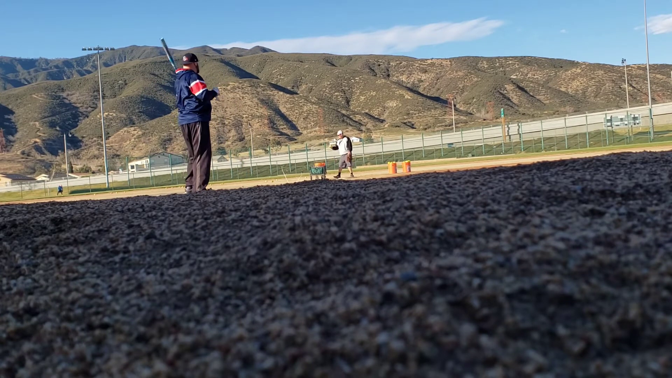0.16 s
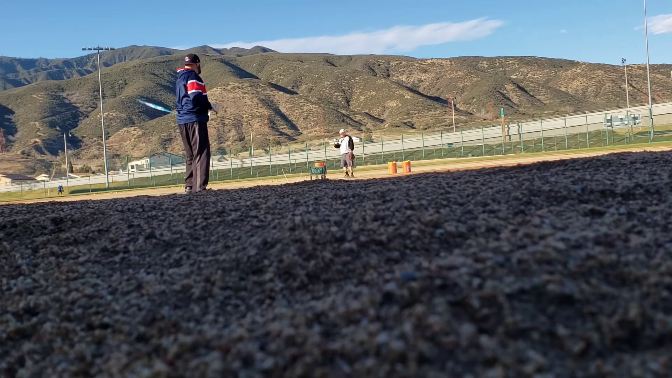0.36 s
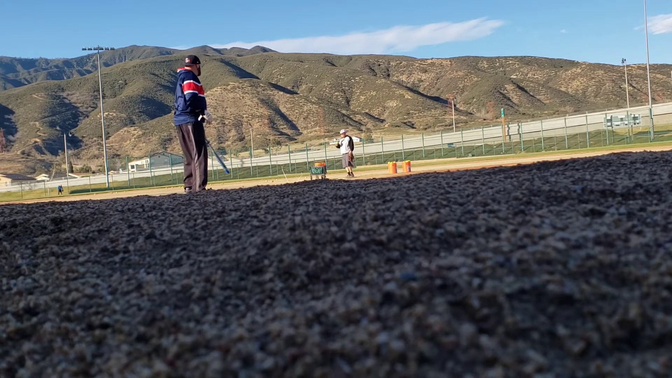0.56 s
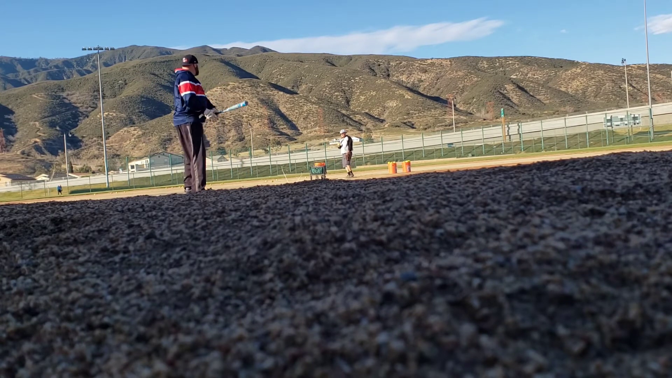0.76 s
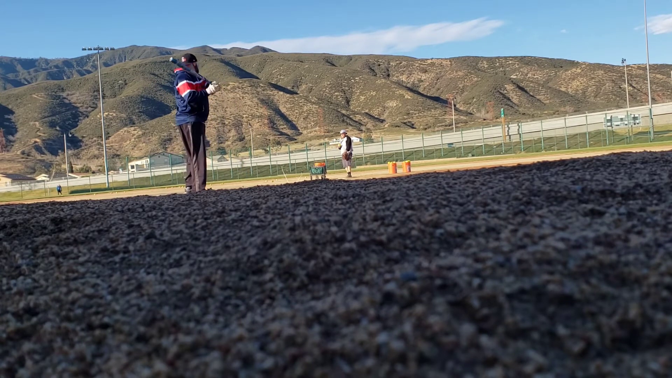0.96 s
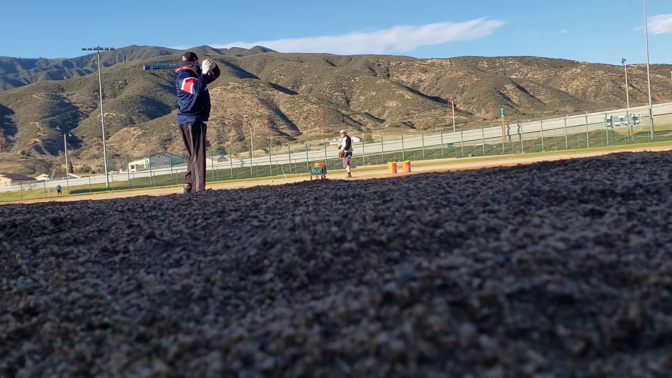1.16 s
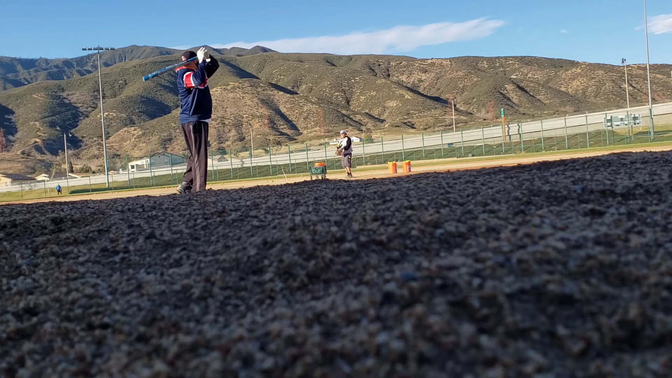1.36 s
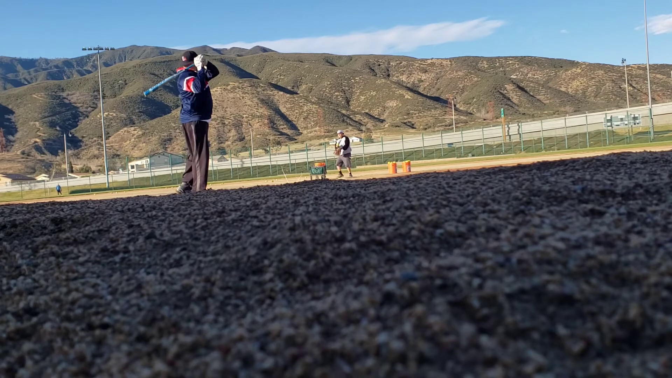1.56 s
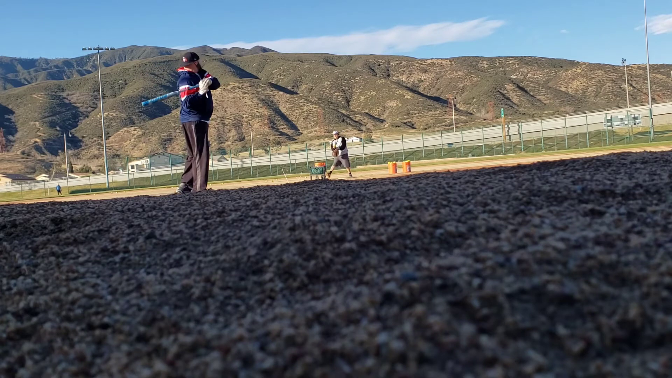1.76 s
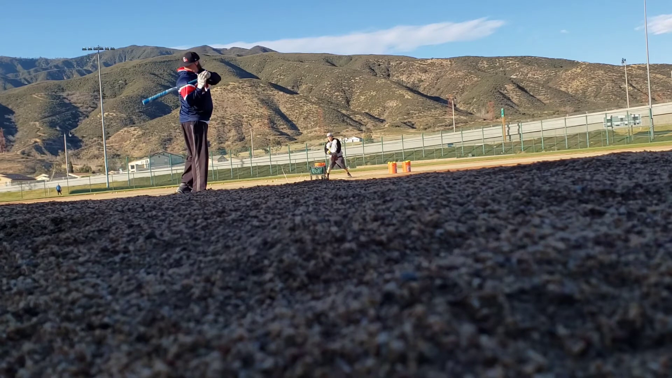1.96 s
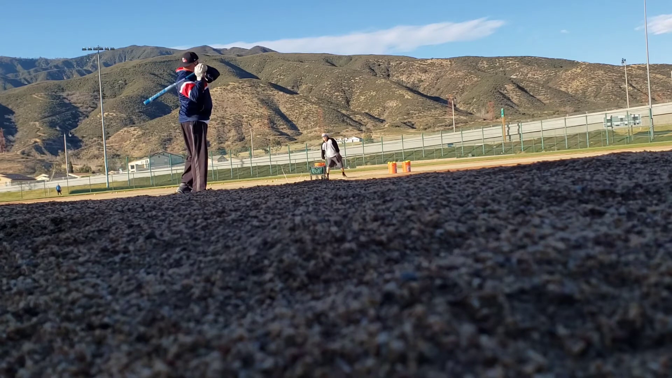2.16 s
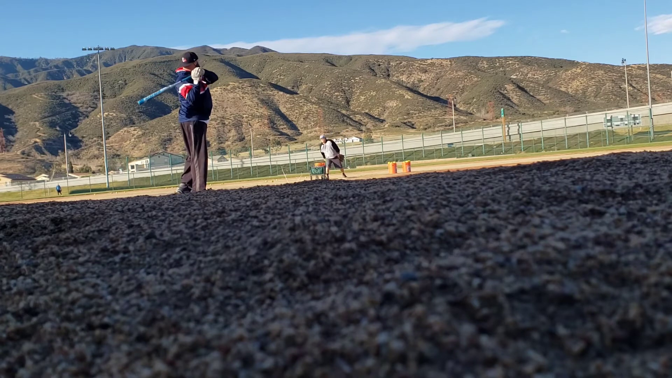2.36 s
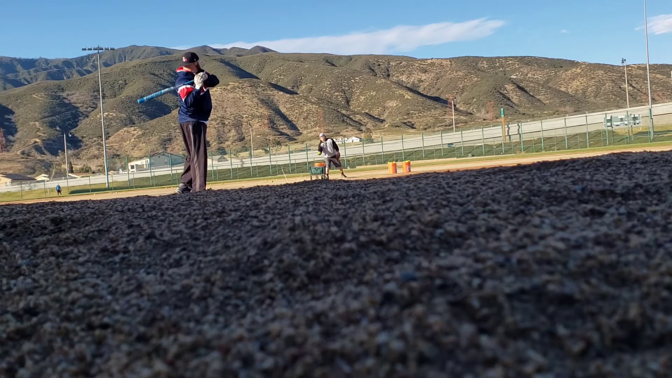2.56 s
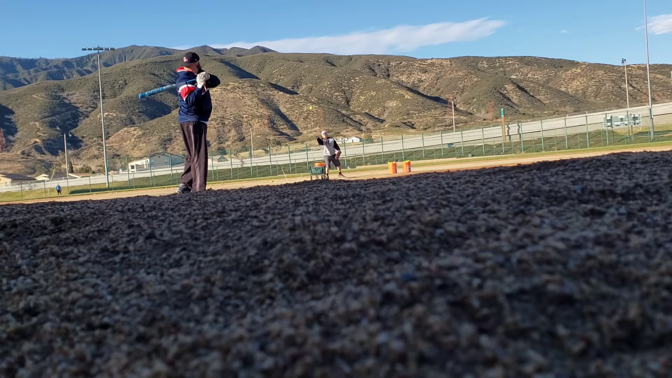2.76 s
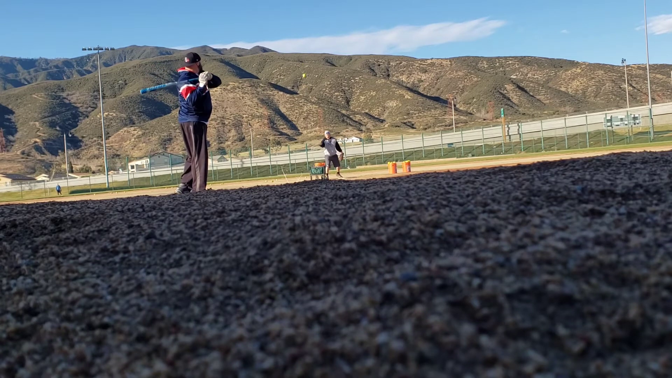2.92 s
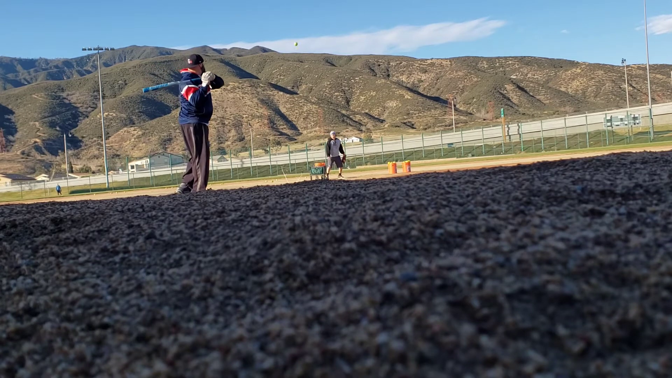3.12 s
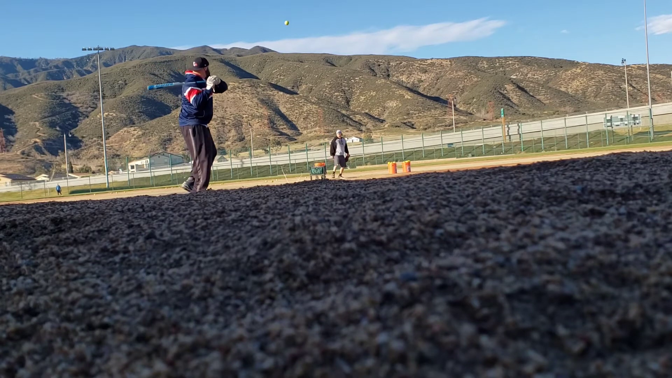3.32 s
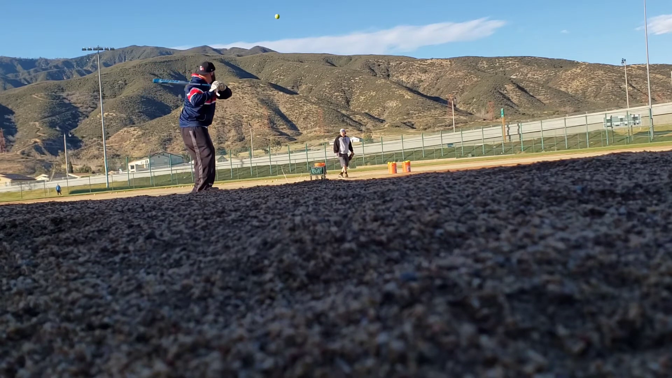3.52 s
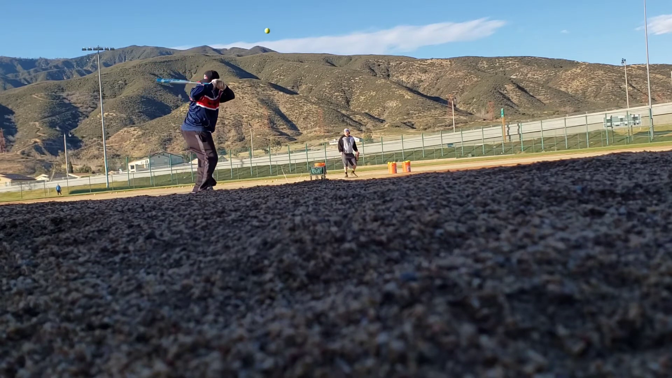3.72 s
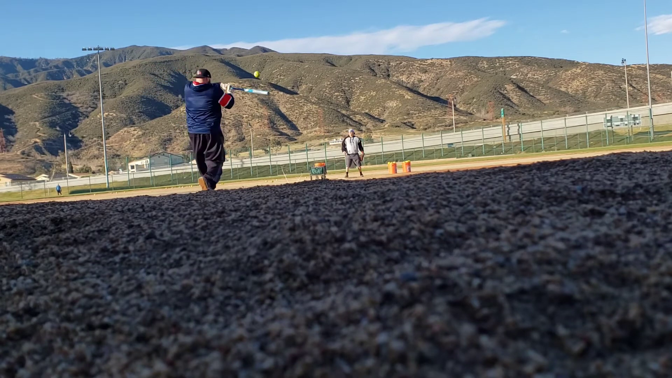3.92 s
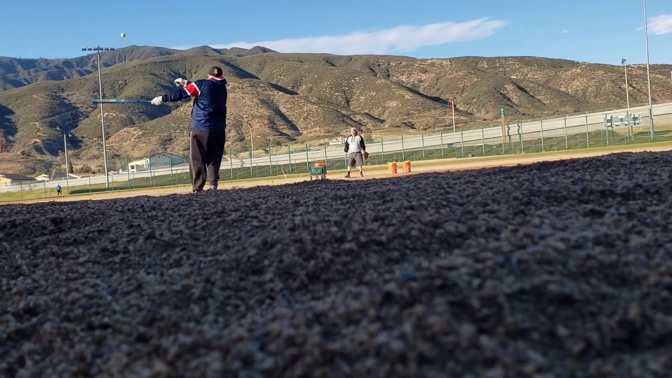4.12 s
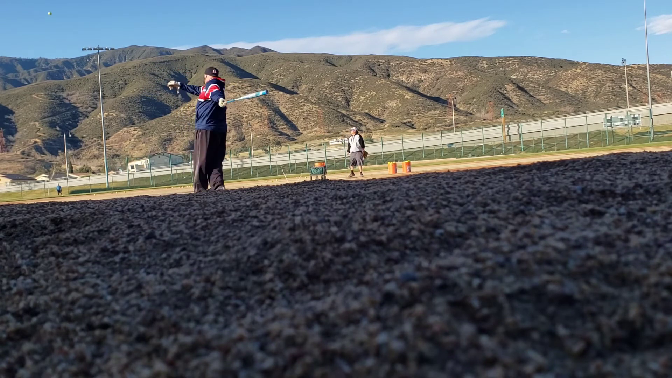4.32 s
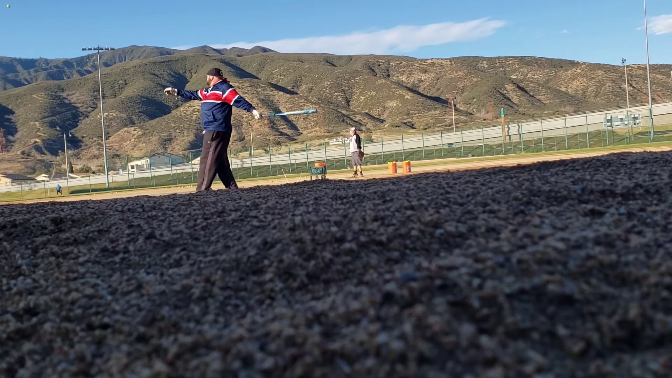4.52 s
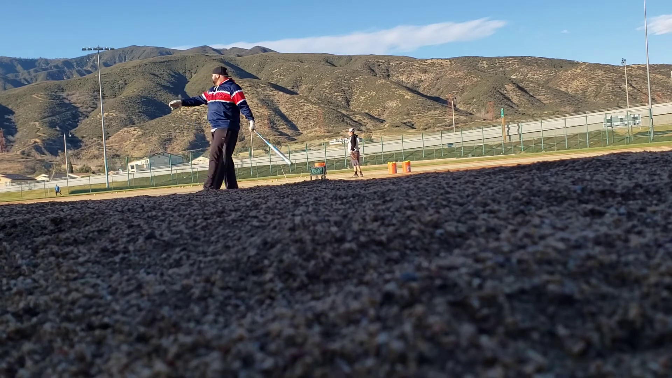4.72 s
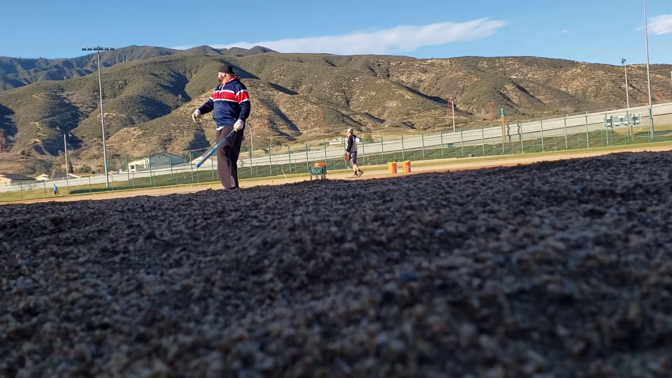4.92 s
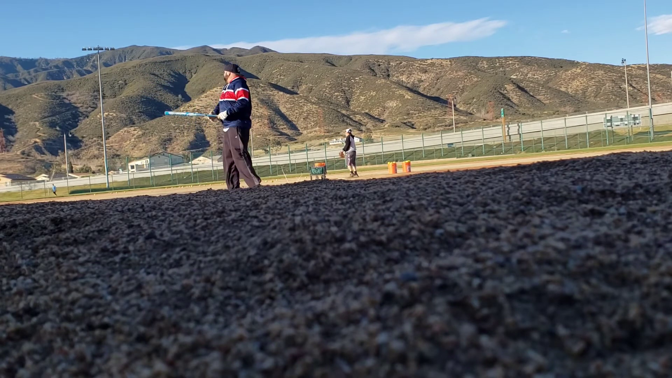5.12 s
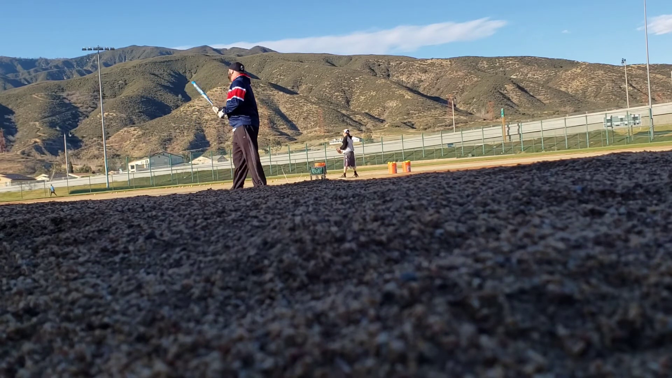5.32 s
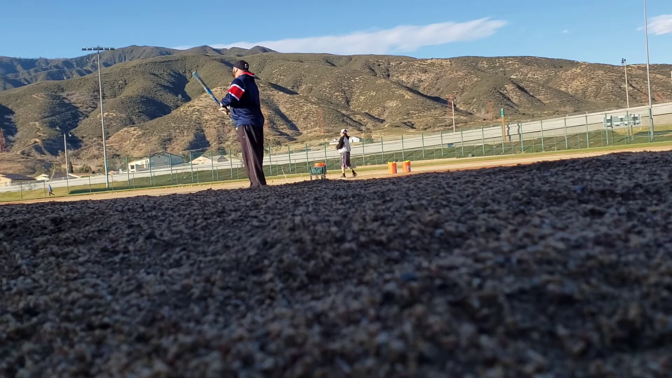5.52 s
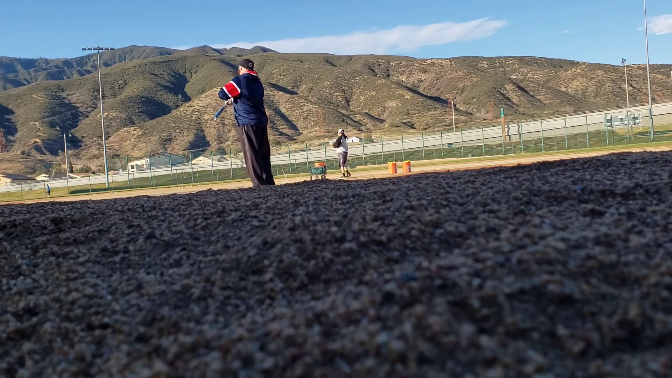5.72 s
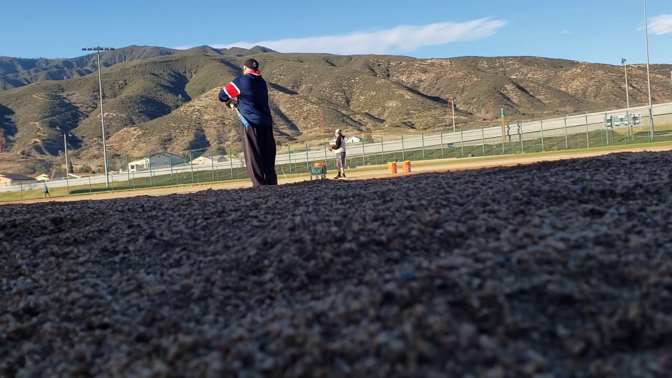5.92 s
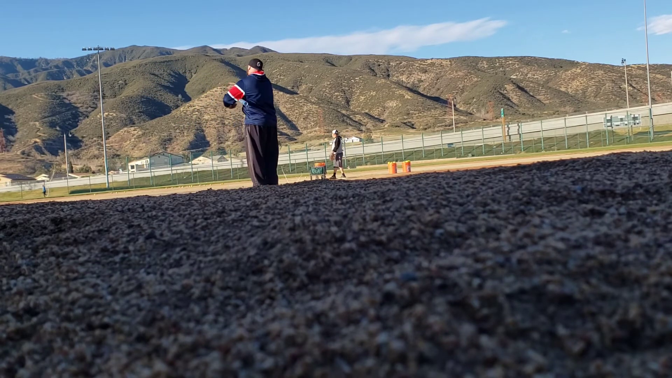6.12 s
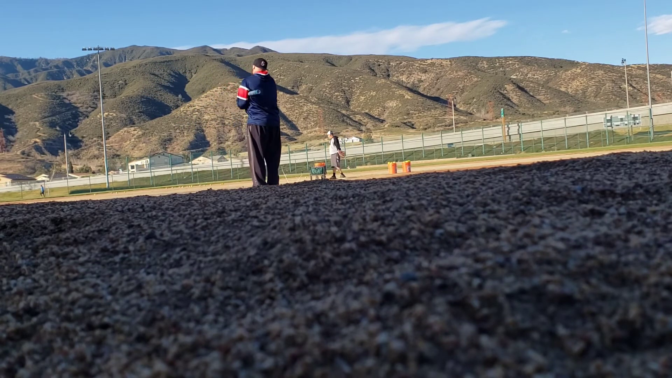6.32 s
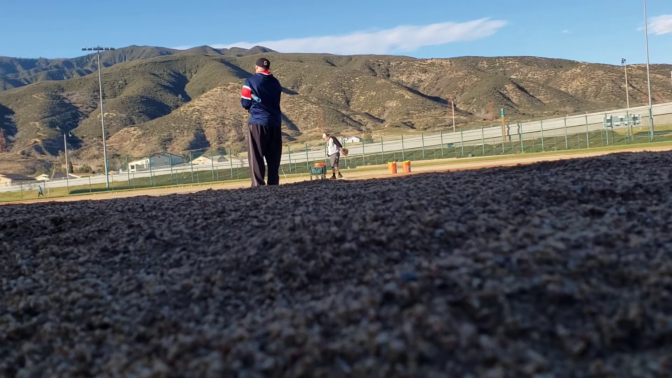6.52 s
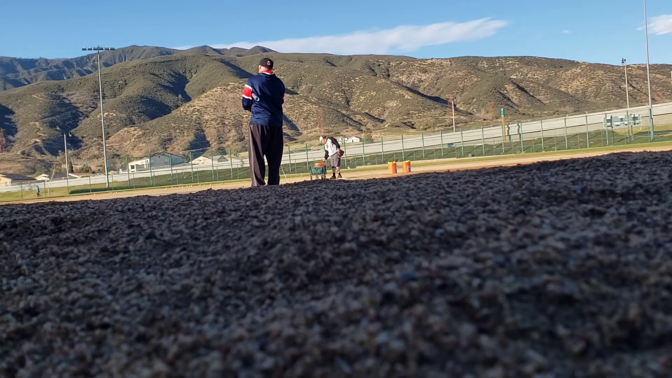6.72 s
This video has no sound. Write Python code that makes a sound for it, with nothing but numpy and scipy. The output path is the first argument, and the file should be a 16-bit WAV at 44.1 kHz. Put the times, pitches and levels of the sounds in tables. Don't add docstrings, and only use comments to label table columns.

```python
import sys
import numpy as np
from scipy import signal
from scipy.fft import rfft, irfft, next_fast_len
from scipy.io import wavfile
from scipy.ndimage import uniform_filter1d, map_coordinates

SR = 44100
rng = np.random.default_rng(int(sys.argv[2]) if len(sys.argv) > 2 else 0)


def boost(x):
    u = np.asarray(x, float) / 20
    return 10 ** u


def wrap_up_sound(samples):
    columns = np.atleast_2d(samples).T
    tamed = np.clip(columns, -1, 1)
    steps = np.round(tamed * 32767).astype(np.int16)
    wavfile.write(sys.argv[1], SR, steps)


N = 303408

# frequency in Hz, level in dB per Hz.
ROAD_COLOUR = [(15, -44.5), (25, -18), (58, 2.5), (103, -4), (128, -3.5), (155, -9), (245, -17), (285, -21),
               (370, -24.5), (450, -28.5), (524, -23.5), (791, -25.5), (1200, -32.5), (1770, -41.5),
               (4500, -77.5), (5850, -105), (9900, -120)]
# frequency in Hz, level in dB per Hz.
HISS_COLOUR = [(1760, -31.5), (3000, -10.5), (3600, -7), (4730, -8), (6670, -5.5), (8880, -17.5),
               (11900, -5.5), (13700, -8), (15100, -9.5), (16000, -16.5)]
# frequency in Hz, likeness from 0 to 1, left lag in rad.
PORT_LIKENESS = [(40, 0.38, .1), (90, 1, .1), (170, 0.89, .1), (262, 0.58, .1), (345, 0.6, .2),
                 (517, 0.33, 1.3), (688, 0.39, 3.2), (855, 0.52, 2.7), (1050, .68, 2.8), (1275, 0.61, 3.1),
                 (1594, 0.41, 4.4), (1900, 0.33, 5.6), (2280, 0.41, 5.7), (2993, 0.056, 8.7)]
# frequency in Hz, left minus right in dB.
PORT_BALANCE = [(60, 0.5), (110, 2), (200, 1), (380, 1), (700, 0), (1290, 0.5), (2380, 0.5), (4400, 3),
                (8120, 8), (15000, -1.5)]
# time in seconds, level in dB.
TRAFFIC = [(0, -1), (.7, -1.25), (1.6, 0.25), (2.5, -0.24), (3.2, 0.23), (4.5, .5), (6.2, -0.45),
           (6.88, -0.1)]
# start in seconds, end in seconds, pitch in Hz, level in dB.
PASSING_ENGINES = [(.6, 2.4, 73, -41), (2.5, 4.5, 90, -41.5), (4, 6.9, 85, -39), (4.8, 5, 75, -34),
                   (0, 1.2, 222, -54.5), (3, 5.9, 245, -55.5), (6.5, 7.5, 160, -46), (2.7, 6.3, 170, -51),
                   (1.92, 2.15, 365, -57), (2.8, 3.05, 240, -48), (1.3, 1.94, 520, -60)]
# start in seconds, push in seconds, level in dB, treble share in dB.
SCUFFS = [
    (3.258, 0.068, -58.5, -1.5),
    (3.37, 0.072, -71.5, -22),
    (3.685, .05, -77, 7.5),
    (3.855, .115, -66.5, -12),
    (3.95, 0.029, -63, -9),
    (3.995, .05, -68, -4),
]
# frequency in Hz, level in dB per Hz.
DIRT_COLOUR = [(880, -36), (1500, -5), (2000, -3), (2640, -4), (3960, -5), (4590, -14), (8000, -18),
               (9280, -26.5), (14600, -23.5), (16000, -27.5)]
# arrival in seconds, left in dB, right in dB, right lag in seconds.
NEAR_PATHS = [
    (4.040695, 0, -.4, .000042),
    (4.046225, -1.8, -2.5, .000122),
    (4.04848, -17.5, -13.3, -.00026),
]
# frequency in Hz, t60 in seconds.
TAIL_T60 = [(400, 0.18), (1100, 0.38), (2000, 0.31), (4500, 0.29), (7500, 0.41), (9500, 0.3), (15000, 0.23)]
# frequency in Hz, level in dB per Hz.
TAIL_COLOUR = [(240, -38), (400, -6), (504, -15), (717, -3.5), (1020, -8), (1120, 2), (1350, -6.5),
               (1640, -3), (2300, -11), (4390, -12.5), (5440, -25.5), (6350, -23), (8760, -34.5),
               (12100, -23), (15700, -28)]
# frequency in Hz, level in dB, t60 in
# seconds, rise in seconds.
BAT_MODES = [
    (1094, 3.3, .053, .0044),
    (1749, -.7, .0064, .00002),
             (1620, -33, 0.07, 0.00088), (2670, -18.5, 0.013, 0.00007), (4030, -14, 0.0098, 0.000023),
               (6452, -14.5, 0.0083, 0.00022), (7750, -26, 0.06, 0.0016), (14000, -6.5, 0.0034, 0.00027),
               (10820, -14, 0.0034, 0.000078)]
# frequency in Hz, level in dB, t60 in seconds, rise in seconds.
BALL_SQUASH = (1174, 9.5, .0025, .00023)
# frequency in Hz, level in dB per Hz.
SNAP_COLOUR = [(3000, -41.5), (4500, -20), (6600, -13.5), (8900, -11), (11000, -12), (13700, -7),
               (15500, -9), (17000, -18)]
# arrival in seconds, left in dB, right in dB, top frequency in Hz.
FAR_WALLS = [(4.12, -34, -36, 3000), (4.185, -33, -35, 2500), (4.228, -33, -35, 1800),
             (4.315, -36, -38, 1600), (4.355, -40, -38, 6000), (4.412, -41, -41, 2000),
             (4.6919, -35, -33.5, 1500), (4.706, -41, -41, 4500), (4.763, -42, -42, 4200),
             (4.621, -30, -33, 2600), (4.6265, -33, -36, 1900)]
# arrival in seconds, level in dB.
SLOPES = [(4.18, -63), (4.26, -67), (4.335, -65), (4.41, -72), (4.49, -70), (4.58, -72), (4.65, -72),
          (4.70, -71), (4.755, -76)]
# frequency in Hz, level in dB per Hz.
SLOPE_COLOUR = [(600, -34.5), (1000, 0), (1300, 3), (2000, -6), (3200, -13), (4600, -27), (7400, -28),
                (11000, -48)]
# frequency in Hz, level in dB.
WHINE = (8430, -99)

TOP_HZ, HISS_TOP_HZ = 16350, 15750
DRONE_HZ, SAG_HZ_PER_S2, LEAVES_S = 129.7, .21, 2.16
DRONE_DB, RECEDE_DB_PER_S, FAR_DB = -37, 11, -43
PASS_SHAPE, UNSTEADY_PER_S = .7, 5
DIG_IN, SETTLE_PUSHES = .55, 5.5
SLOPE_RISE_S, SLOPE_T60_S = .018, .5
LEAD_S = .001
SNAP_DB, BITE_S = 6.5, .00008
DUCK_DB, DUCK_S, HOLD_S, RECOVER_DB_PER_S = 7, .024, 2.1, 7.5
STOP_S = .004
CRACK_S = NEAR_PATHS[0][0]


def unit(x):
    return x / np.sqrt(np.mean(x ** 2) + 1e-20)


def along(points, hz):
    f, v = np.transpose(points)
    return np.interp(np.log(hz + 1), np.log(f + 1), v)


def curves(rows):
    s, *cols = np.transpose(rows)
    return [np.interp(np.arange(N) / SR, s, c) for c in cols]


def wobble(rate):
    knots = rng.standard_normal(int(N * rate / SR) + 4)
    return map_coordinates(knots, [np.arange(N) * rate / SR])


def swell(start, rise, hold, t60):
    age = np.arange(N) / SR - start
    return np.clip(age / rise, 0, 1) * boost(-60 * np.maximum(age - rise - hold, 0) / t60)


def filtered(x, response):
    m = next_fast_len(N + SR // 2)
    return irfft(rfft(x, m) * response(np.fft.rfftfreq(m, 1 / SR)), m)[..., :N]


def lowpass(x, corner_hz):
    return filtered(x, lambda hz: 1 / (1 + (hz / corner_hz) ** 4))


def hiss_limited(x):
    return filtered(x, lambda hz: hz < HISS_TOP_HZ)


def tone(hz):
    return np.sin(2 * np.pi * np.cumsum(hz) / SR)


def diffuse(pair, spectrum):
    table = np.array(PORT_LIKENESS)

    def mid_side(hz):
        turn = np.arccos(np.clip(along(table[:, :2], hz), 0, 1)) / 2
        return boost(along(spectrum, hz)) * [np.cos(turn), np.sin(turn)]

    def ports(hz):
        left_over_right = boost(along(PORT_BALANCE, hz)) * np.exp(-1j * along(table[:, ::2], hz))
        return left_over_right ** np.array([[.5], [-.5]])

    mid, side = filtered(pair, mid_side)
    return unit(filtered(np.array([mid + side, mid - side]), ports))


def patchy(depth_db):
    z = signal.stft(rng.standard_normal((2, N)), nperseg=512)[2]
    patches = uniform_filter1d(rng.standard_normal(z.shape[1:]), size=5, axis=0)
    patches = uniform_filter1d(patches, size=14, axis=1)
    return signal.istft(z * boost(depth_db * unit(patches)), nperseg=512)[1][:, :N]


def road():
    busy_db, = curves(TRAFFIC)
    wash = diffuse(patchy(depth_db=1.21), ROAD_COLOUR)
    rumble = lowpass(wash, 280)
    roar = wash - rumble
    hiss = hiss_limited(diffuse(patchy(depth_db=0.4), HISS_COLOUR))
    return boost(busy_db) * (boost(-34) * rumble + boost(-31.5) * roar) + boost(-80) * hiss


def engines():
    t = np.arange(N) / SR
    drone_hz = DRONE_HZ - SAG_HZ_PER_S2 * t ** 2
    drone_db = np.maximum(DRONE_DB - RECEDE_DB_PER_S * np.maximum(t - LEAVES_S, 0), FAR_DB)
    x = boost(drone_db + 1.2 * wobble(UNSTEADY_PER_S)) * tone(drone_hz + .8 * wobble(6))
    for start, end, hz, db in PASSING_ENGINES:
        passing = np.sin(np.pi * np.clip((t - start) / (end - start), 0, 1)) ** PASS_SHAPE
        x += passing * boost(db + 3.5 + 3.5 * wobble(6.7)) * tone(hz * (1 + .02 * wobble(9)))
    return x * boost([[.8], [-.8]])


def shoes():
    x = np.zeros((2, N))
    grit = rng.standard_normal((2, N)) * boost(2.4 * wobble(500) + 1.1 * wobble(60))
    crunch = diffuse(grit, DIRT_COLOUR)
    dull = lowpass(crunch, 4500)
    treble = hiss_limited(crunch - dull)
    for start, push, db, tilt_db in SCUFFS:
        force = swell(start, DIG_IN * push, (1 - DIG_IN) * push, SETTLE_PUSHES * push)
        x += boost(db + 3.5) * (force * dull + boost(tilt_db + 2.5) * force ** 1.3 * treble)
    return x


def field():
    hz, frame_s, z = signal.stft(rng.standard_normal((2, N)), SR, nperseg=128)
    decay = boost(-60 * np.abs(frame_s - CRACK_S) / along(TAIL_T60, hz)[:, None])
    tail = signal.istft(z * decay, SR, nperseg=128)[1][:, :N]
    spread = hiss_limited(diffuse(tail * boost(1.1 * wobble(110)), TAIL_COLOUR))
    near = np.clip((np.arange(N) / SR - CRACK_S) / .02, 0, 1) ** .6 * spread
    power = sum((boost(db + 17.5) * swell(s, SLOPE_RISE_S, 0, SLOPE_T60_S)) ** 2 for s, db in SLOPES)
    haze = diffuse(patchy(depth_db=1.5), SLOPE_COLOUR)
    return boost(-41.0) * near + np.sqrt(power) * boost(1.1 * wobble(150)) * haze


def echoes(crack):
    def arrival(hz, s, left_db, right_db):
        return boost([[left_db], [right_db]]) * np.exp(-2j * np.pi * hz * (np.array(s) - LEAD_S))

    def near(hz):
        sides = np.array([[0], [1]]) / (1 + (hz / 9000) ** 4)
        return sum(arrival(hz, s + lag * sides, left, right) for s, left, right, lag in NEAR_PATHS)

    def far(hz):
        return sum(arrival(hz, s, left, right) / (1 + (hz / top_hz) ** 4)
                   for s, left, right, top_hz in FAR_WALLS)

    t = np.arange(N) / SR
    x = filtered(crack, near) + filtered(crack * boost(-900 * t), far)
    age = t - CRACK_S - .03
    clutter = rng.standard_normal((2, N)) * (age > 0) * boost(-61.5 - 60 * np.abs(age) / 1.1)
    note = lowpass(crack, 2500)[None, :4096]
    return x + signal.fftconvolve(clutter, note, axes=1)[:, :N]


def bat():
    t = np.arange(N) / SR - LEAD_S
    u = np.clip(t, 0, 1)

    def mode(hz, db, t60, rise):
        return boost(db - 60 * u / t60) * (1 - np.exp(-u / rise)) * np.sin(2 * np.pi * hz * u)

    click = 1. * (np.arange(N) == np.argmax(t > BITE_S))
    snap = filtered(click, lambda hz: boost(SNAP_DB + along(SNAP_COLOUR, hz)))
    snap = snap * np.exp(np.minimum(t, 0) / .00015)
    grip = boost(-250 * np.maximum(u - .02, 0))
    ring = sum(mode(*m) for m in BAT_MODES)
    return grip * ring - mode(*BALL_SQUASH) + snap


def scene():
    return road() + engines() + shoes() + field() + echoes(bat())


def gain_control():
    age = np.arange(N) / SR - CRACK_S
    duck_db = DUCK_DB * np.clip(age / DUCK_S, 0, 1)
    return boost(np.minimum(RECOVER_DB_PER_S * np.maximum(age - HOLD_S, 0) - duck_db, 0))


def low_pass(x):
    return signal.sosfilt(signal.butter(12, 16610, fs=SR, output="sos"), x)


def record(dry):
    t = np.arange(N) / SR
    whine_hz, whine_db = WHINE
    whine = boost(whine_db + 2.5 * wobble(8)) * np.sin(2 * np.pi * whine_hz * t)
    held = np.clip((dry + whine) * gain_control(), -1, 1)
    held = held * np.clip(t[::-1] / STOP_S, 0, 1)
    mix = filtered(held, lambda hz: 1 / (1 + (hz / TOP_HZ) ** 60))
    return low_pass(mix)


dry = scene()
out = record(dry)
wrap_up_sound(out)
```